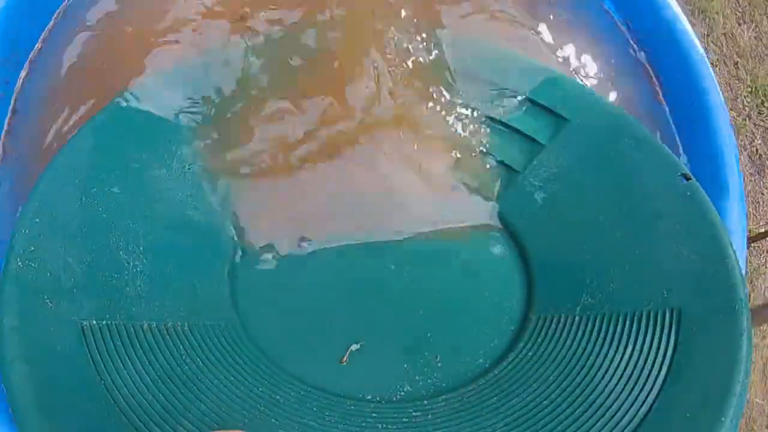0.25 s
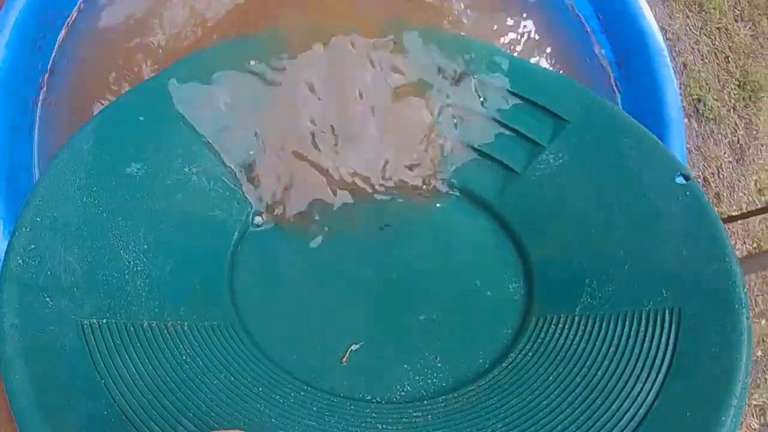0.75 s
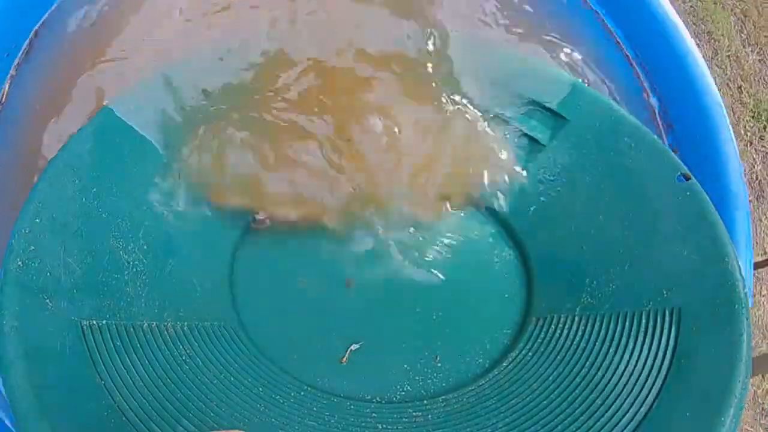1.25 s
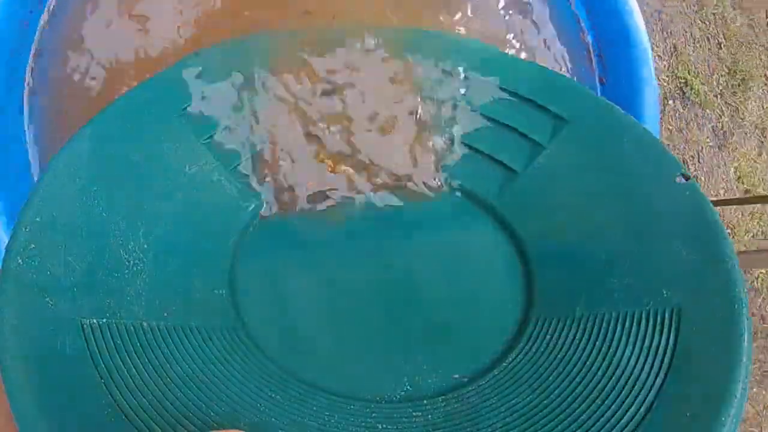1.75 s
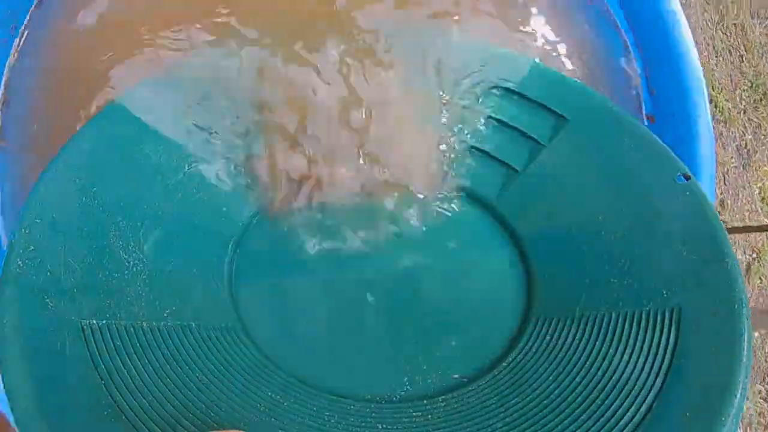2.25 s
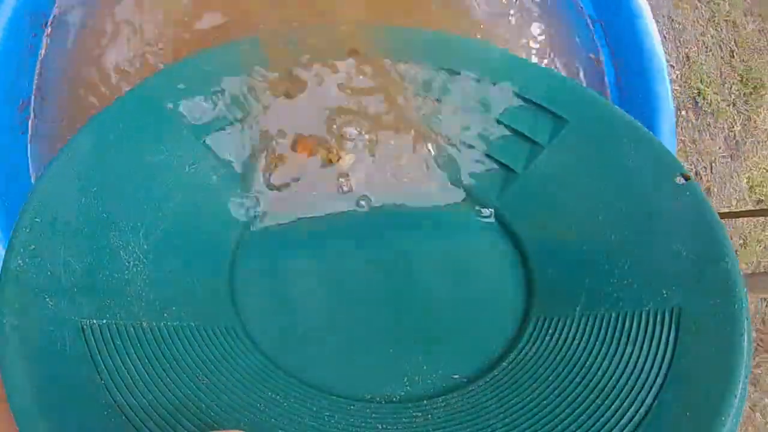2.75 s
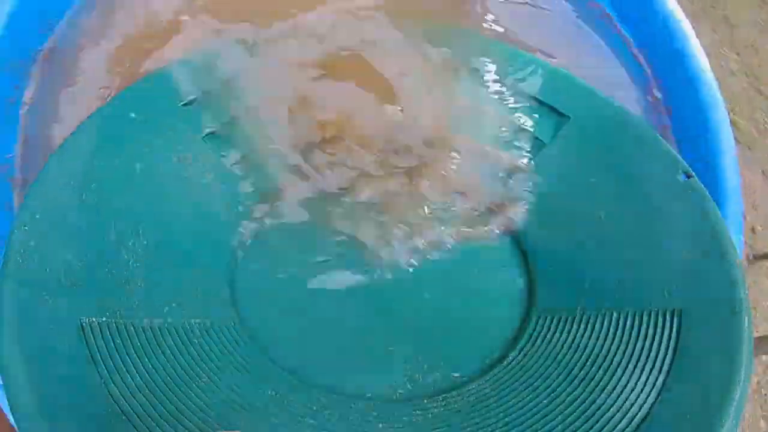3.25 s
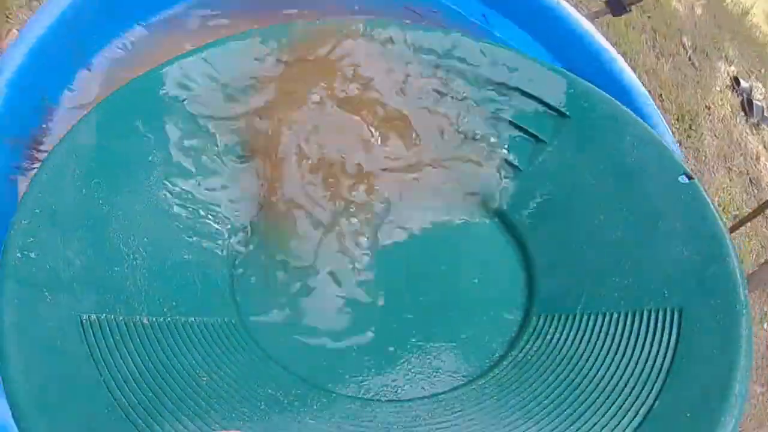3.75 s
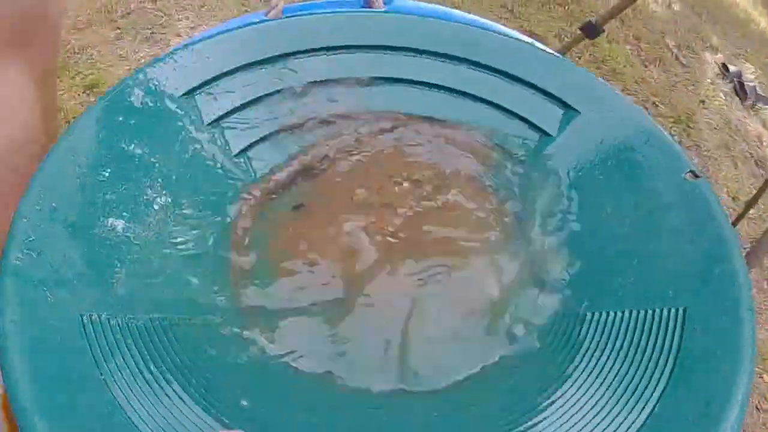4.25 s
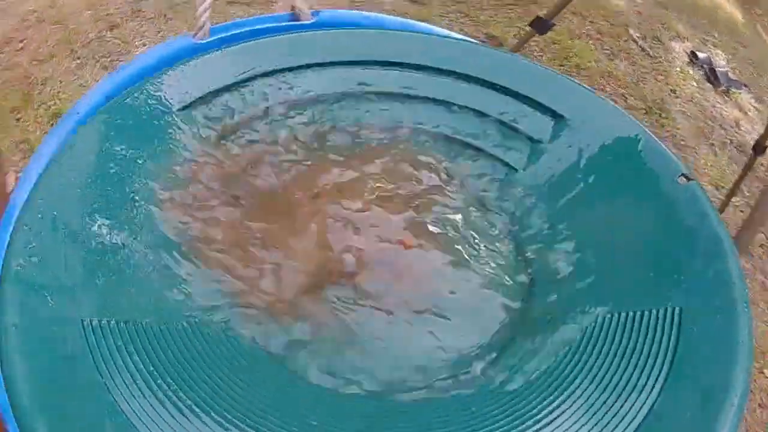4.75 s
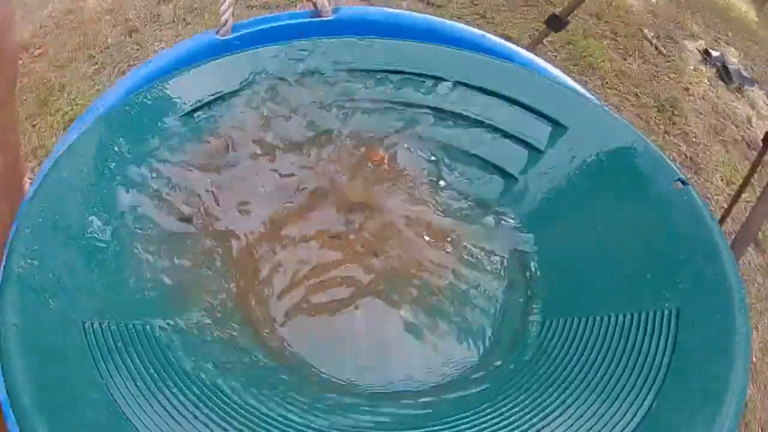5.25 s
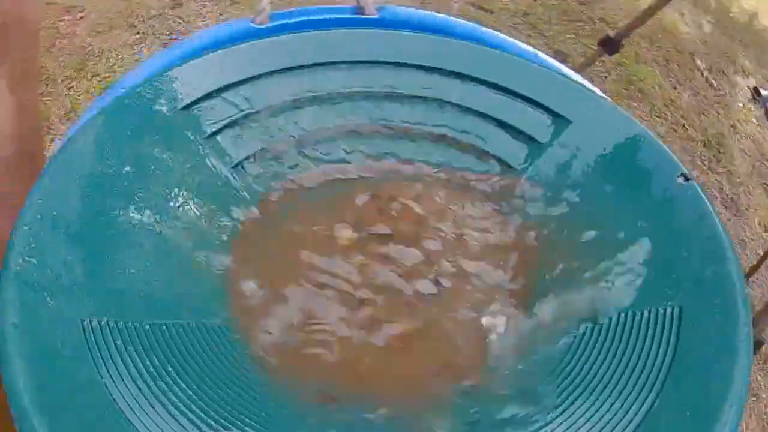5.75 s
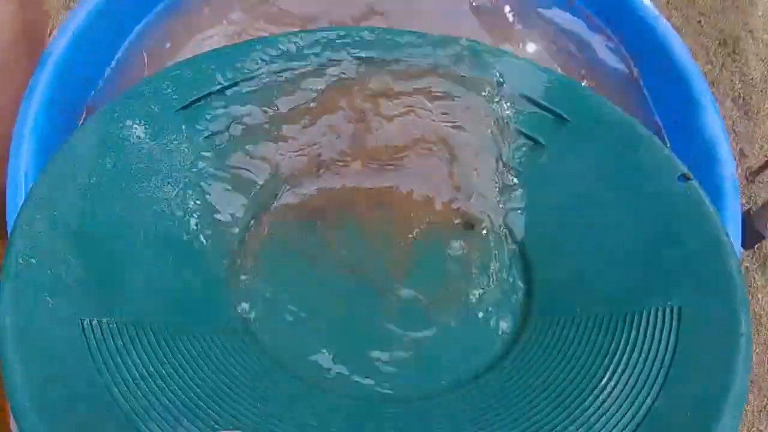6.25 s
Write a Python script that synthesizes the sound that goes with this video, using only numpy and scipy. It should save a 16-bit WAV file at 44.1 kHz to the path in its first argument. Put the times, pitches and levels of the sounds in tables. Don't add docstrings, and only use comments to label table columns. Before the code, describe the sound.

Water slaps and trapped bubbles pop against a resonant plastic shell, with short quiet gaps between dips. A thumping splash follows, then a brief lull, and the swirling load bursts in: gritty sand rush, pebbles clicking, stones knocking hard, slightly overloaded. It stops abruptly with a gulp. Dry, open-air, microphone attached to the rim, low handling rumble and faint hiss.

```python
import sys
import numpy as np
from scipy import signal
from scipy.fft import rfft, irfft
from scipy.io import wavfile
from scipy.ndimage import uniform_filter1d

SR = 44100
rng = np.random.default_rng(int(sys.argv[2]) if len(sys.argv) > 2 else 0)


def to_wav(s):
    ch = np.atleast_2d(s).T
    pcm = np.round(np.clip(ch, -1, 1) * 32767)
    wavfile.write(sys.argv[1], SR, pcm.astype(np.int16))


def voltage_ratio(decibels):
    exponent = np.asarray(decibels, float) / 20
    return 10 ** exponent


N = 286076

# time in seconds, wash level in dB.
WASH = [(0.0, -58.5), (.19, -62.5), (.3, -51.5), (.55, -42), (.8, -51), (.97, -64.5), (1.13, -47),
        (1.42, -47.5), (1.55, -48), (1.8, -54), (1.96, -55.5), (2.13, -37.5), (2.699, -40.5),
        (2.879, -60.5), (3.05, -35), (3.22, -24), (4.6, -23.5), (6.22, -23), (6.399, -51)]
SWIRL_DB = -24
STILL_DB = -70

# frequency in Hz, gain in dB.
SHELL = [(150, -40), (300, -26), (450, -12), (1300, -7), (1650, -5), (1800, -18), (2600, -25), (3300, -24),
         (3950, -34), (4150, -42), (5300, -47), (6300, -58), (8000, -73), (12000, -100)]
# frequency in Hz, width in Hz, gain in dB.
PAN_MODES = [(428, 58, 11.5), (610, 22, -15.5), (784.7, 29.7, -13.5), (810.6, 61, 10), (953, 60, -9),
             (1040, 79, 4), (1176, 112, -8), (1410, 74, 4), (1610, 53, 2.5), (1710, 340, -4.5),
             (2135, 180, 2.5)]
# frequency in Hz, width in Hz, gain in dB.
RIM_MODES = [(2980, 150, -11), (3250, 300, 4), (3720, 200, -5), (3930, 90, 4), (4620, 300, -6),
             (5150, 250, 5), (5750, 400, -6), (6330, 250, 6), (6800, 300, -5), (7500, 900, 5),
             (8700, 900, -12), (10000, 500, 9)]
# frequency in Hz, width in Hz, gain in dB.
SAND_LIFT = (2150, 900, 2.5)
# frequency in Hz, width in Hz, gain in dB.
LOADED_LIFT = (1540, 560, 2.4)
LOADED_SAG, LOADED_DB = 0.98, 0
EDGE_HZ = 2000

# start in seconds, peak in dB, bubble pitch in Hz, sharp edge in dB, bubble share in dB.
OPENING = [
    (-0.003, -9, 1032, -29.5, 1.8),
    (-0.002, -20.5, 445, -50, 14),
]
# peak time in seconds, then as the opening knock.
FIRST_DIP = [(0.112, -34.5, 2410, -47, 10), (0.231, -34, 400, -57, -5), (0.255, -29, 1410, -67, -23),
             (0.274, -14, 986, -44, 8), (0.313, -23.5, 1430, -62, -6), (0.364, -30.5, 980, -67, -1),
             (0.398, -29.5, 670, -59, -1), (0.448, -21, 1350, -51, -0.5), (0.469, -21.5, 1300, -34.5, 13),
             (0.521, -8, 1500, -24, 1.5), (0.587, -28, 695, -37, -5), (0.634, -25, 583, -43, 11),
             (0.673, -18.5, 1534, -25.5, 12), (0.712, -25.5, 1050, -45.5, 2), (0.752, -27, 826, -39, -11),
             (0.771, -18.5, 1400, -39, -7), (0.841, -37, 814, -46, 4), (0.858, -30.5, 480, -48, 8),
             (0.92, -27, 2150, -75, 10)]
SECOND_DIP = [(1.098, -28, 445, -45, 1), (1.153, -25, 1630, -46, -2), (1.204, -25, 790, -38, 2),
              (1.258, -19, 830, -33.5, -5), (1.291, -22.5, 1040, -46, 14), (1.358, -32, 760, -42, -4),
              (1.387, -22.5, 1430, -35, -17), (1.409, -23, 420, -39, -13), (1.438, -17.5, 1350, -44, 10),
              (1.521, -27.5, 813, -67.5, 17), (1.566, -36, 1390, -65, -5), (1.615, -14.5, 1410, -28.5, -10),
              (1.673, -55, 1450, -53, -4), (1.698, -14.5, 1390, -35, -8), (1.733, -19, 1440, -52, -6),
              (1.778, -16, 470, -52, -12), (1.803, -22.5, 428, -38.5, -22), (1.831, -26.5, 820, -48, -9),
              (1.884, -44.5, 423, -53, 5)]
THIRD_DIP = [(2.14, -19.5, 1610, -56, 5), (2.167, -21, 1010, -38, -2.5), (2.203, -16, 1040, -37, -1.5),
             (2.256, -16, 1420, -33, -14), (2.276, -21.5, 420, -57, 21), (2.301, -8.5, 1430, -33.5, 9),
             (2.326, -17, 1290, -51, 2), (2.383, -15, 1040, -49, -3.5), (2.416, -32, 830, -54, 7),
             (2.542, -17, 1504, -36.5, 0.5), (2.574, -9, 1503, -29.5, 3.5), (2.616, -21, 1410, -37, 0),
             (2.638, -6, 1634, -16, 2), (2.683, -27.5, 1400, -57, 19), (2.721, -22.5, 1410, -28.5, -5),
             (2.771, -55, 1420, -44.5, 14), (2.802, -35.5, 1470, -45, 9), (2.847, -39, 818, -47.5, -12),
             (2.897, -36.5, 430, -42, -2)]
SMALL_KNOCKS = [(0.327, -31, 436, -49, -7), (0.516, -31, 1570, -41, 10), (0.667, -16, 1370, -41, -12),
                (1.113, -31, 430, -61, 19), (1.273, -20.5, 1020, -31, 0), (1.629, -24, 1540, -37, 10),
                (1.707, -23, 1400, -38, -6), (1.753, -29, 426, -59, -1), (1.996, -37, 1010, -48, -9),
                (2.135, -29, 1540, -57, -6)]
# start in seconds, then as the dips.
PLUNGE = [(2.015, -24, 1010, -53, 9), (2.046, -8.5, 1650, -25, -16), (2.054, -11, 440, -16.5, 3),
          (2.064, -10, 1020, -20, -8), (2.08, -5.5, 769, -16.5, 0.5), (2.093, -18, 452, -13.5, -4),
          (2.102, -14, 875, -29, 3), (2.114, -16, 452, -47, -3)]
# start in seconds, then as the dips.
LIFT = [
    (2.941, -14, 333, -66, 7),
    (2.946, -14, 723, -56, 21),
    (3.008, -19.5, 1410, -44, -7),
    (3.058, -7.5, 1311, -17.5, 2.5),
    (3.069, -9, 1334, -14, -8),
    (3.087, -15, 1640, -25, -4),
]
# start in seconds, then as the dips.
SETTLE = [
    (6.296, -6.5, 355, -22, -2.5),
    (6.305, -8.5, 712, -23, 18),
    (6.328, -14.5, 1484, -27.5, 1),
    (6.384, -29.5, 2000, -31, 8),
    (6.445, -39, 2650, -62, 4),
]
SPLASH_S, GULP_S, STONE_S = 0.0029, 0.0048, 0.0024
LEAD_S, CREST_DB = 0.001035, 7.5
WET_HZ, STONE_HZ = 4180, 7650

# peak time in seconds, peak in dB, ring
# pitch in Hz, sharp edge in dB.
STONES = [(3.164, -23, 1340, -33), (3.232, -16, 834, -47), (3.256, -9, 1340, -46),
          (3.27, -6, 1270, -22), (3.294, -6, 1404, -23.5), (3.389, -20, 1410, -38),
          (3.41, -15, 437, -39), (3.45, -3.5, 1390, -20.5), (3.483, -2, 1470, -25.5),
          (3.504, -17, 1440, -44.5), (3.533, -5, 1550, -27), (3.648, -11, 1400, -45),
          (3.899, -12, 1335, -37), (3.931, -12, 1410, -33.5), (4.01, -6.5, 1710, -42),
          (4.069, -10, 1500, -24), (4.185, -8, 1537, -26.5), (4.212, -23, 1540, -42),
          (4.248, -5, 1400, -23.5), (4.308, -10.5, 843, -23), (4.391, -13, 1520, -42),
          (4.424, -9.5, 810, -28), (4.451, -17, 1690, -28), (4.483, -1, 1440, -17),
          (4.494, -8, 413, -20.5), (4.554, -9.5, 820, -35), (4.601, -8, 1360, -30),
          (4.682, -33, 827, -44), (4.704, -26, 1610, -45),
          (4.721, -11, 1610, -41), (4.752, -7.5, 790, -27.5), (4.798, -10.5, 1430, -22.5),
               (4.822, -1, 814, -10.5), (4.8815, -5.5, 1514, -24), (4.945, -14.5, 800, -31.5),
               (5.072, -0.5, 1330, -17.5), (5.116, -4, 1040, -17), (5.142, -5.5, 840, -20.5),
               (5.202, -9, 1313, -28), (5.255, -16, 1610, -29), (5.3, -8.5, 715, -46),
               (5.371, -12.5, 1570, -17.5), (5.425, -18, 1500, -28), (5.449, -1, 886, -18.5),
               (5.491, -10, 1410, -43), (5.568, -6.5, 1620, -40.5), (5.592, -5, 1620, -43.5),
               (5.626, -4.5, 1455, -19), (5.705, -12, 1363, -26.5), (5.751, -15, 1380, -32),
               (5.812, -9, 777, -31), (5.909, -11, 1460, -28), (5.986, -7.5, 1540, -45),
               (6.031, -9.5, 832, -26), (6.12, -7.5, 804, -30), (6.174, -9, 1420, -24.5),
               (6.245, -0.5, 1410, -18.5)]
STONE_RING_DB = -1.5
# peak time in seconds, peak in dB, pitch in Hz.
PEBBLES = [(3.304, -15, 1460), (3.3222, -11.5, 1410), (3.466, -10.5, 1420), (3.5693, -18, 1630),
           (3.6596, -18, 1440), (3.6703, -12.5, 1610), (3.8121, -17.5, 1400), (3.9473, -16, 1510),
           (4.101, -11.5, 1360), (4.134, -12, 1410), (4.1452, -12, 1390), (4.1677, -19, 1240),
           (4.1683, -12, 1390), (4.1974, -12.5, 1550), (4.3267, -14, 1320), (4.6142, -12.5, 1470),
           (4.8264, -5, 1546), (4.8507, -12.5, 1380), (4.8977, -10.5, 1470), (4.888, -8, 1500),
           (5.107, -9, 1490), (5.3909, -10, 1550), (5.6063, -12, 1494), (5.7587, -8.5, 1440),
           (5.797, -10, 1470), (5.097, -15.5, 1390), (5.8505, -12, 1520), (5.866, -14.5, 1550),
           (5.917, -14.5, 1480), (5.925, -9, 1590), (5.9963, -8.5, 1580), (6.0477, -14, 1560),
           (6.0617, -6.5, 1145), (6.0831, -11, 1420), (6.131, -9, 1150), (6.131, -15, 1410),
           (6.1858, -11, 1410), (6.2147, -13.5, 1410), (6.2368, -14.5, 1440), (6.2578, -18.5, 1440)]
# peak time in seconds, peak in dB, pitch in Hz.
COBBLES = [(3.202, -15, 1040), (4.223, -12, 670), (4.488, -10, 840), (4.62, -12.5, 827), (4.733, -13, 815),
           (4.98, -14, 1040), (5.36, -18, 780), (5.473, -10.5, 830), (5.552, -20, 840), (6.095, -12.5, 850)]
PEBBLE_EDGE_DB, PEBBLE_RING_DB = -10.5, 4.5

# time in seconds, lift over the wash in dB.
SURGES = [(3.28, 5.5), (3.47, 5), (3.59, 5.5), (4.59, 3.5), (4.02, 3), (4.22, 3.5), (4.47, 7.5), (4.83, 8),
          (4.95, 2), (5.11, 7), (5.385, 6.5), (5.46, 1.5), (5.68, 3), (5.82, 2), (6.03, -0.5), (6.18, 2.5)]
# time in seconds, lift over the wash in dB.
LULLS = [(3.246, -6), (3.44, -5.5), (3.958, -9.5), (4.665, -7.5), (4.77, 2), (4.868, -5.5), (4.912, -5),
         (5.02, 0), (5.325, -6.5)]
SURGE_S, LULL_S = 0.044, 0.012
SURGE_BRIGHT = 1
GRIT_DB, GRIT_SLOPE = -35, 0.99
SLOW_CLUMP_DB = 1.5

# start in seconds, peak in dB, pitch in Hz.
BUMPS = [(1.137, -27, 490), (1.167, -34, 514), (2.06, -14, 252), (3.05, -30, 302), (3.445, -36, 289),
         (3.685, -25, 252.4), (4.007, -37, 111), (5.679, -37, 114.4), (6.289, -21.5, 230)]
# start in seconds, peak in dB, pitch in Hz.
THUDS = [
    (2.053, -29, 126),
    (2.084, -24.5, 180),
    (2.943, -38, 125),
    (6.303, -37, 137),
]
# start in seconds, peak in dB, pitch in Hz, fade in seconds.
TUB_RING = (2, -38.5, 163, 0.08)
# time in seconds, lift over the resting rumble in dB.
JOLTS = [(0.0, 27.5), (1.14, 10.5), (1.27, 5), (.86, 10.5), (2.08, 29), (2.33, 11), (2.2, 15), (3.03, 17),
         (3.68, 13.5), (4.01, 6), (4.22, 5), (4.5, 3.5), (4.9, 7), (6.16, 8), (6.31, 19)]
# frequency in Hz, level in dB per Hz.
RUMBLE = [(20, -3.5), (45, -8.5), (88, 3.5), (130, -6), (160, -0.5), (200, -12), (300, -3.5), (500, -40),
          (1200, -130)]
REST_DB, GRIP_SLOPE, JOLT_S = -57.5, 0.3, 0.053

# start in seconds, peak in dB, pitch in Hz.
SPRAY = [(.328, -58, 4900), (0.569, -46, 4100), (1.197, -52, 5100), (1.261, -54, 6300), (2.201, -54, 5960),
         (2.239, -37.5, 4880), (2.257, -59.5, 5500), (2.288, -55, 4460), (2.333, -63, 5140)]
SPRAY_S = 0.0019
# peak time in seconds, peak in dB, pitch in Hz.
SLAPS = [(3.0705, -11, 2170), (3.3033, -10.5, 2140), (3.4657, -13, 2060), (3.7367, -20, 2200),
         (4.0524, -20, 2080), (4.0866, -22, 2030), (4.1172, -18, 2040), (4.1318, -20, 2080),
         (4.2848, -20, 2130), (4.3214, -30, 2340), (4.4509, -10, 2100), (4.7533, -20, 2100),
         (4.981, -18, 1780), (5.865, -23, 2240), (5.9714, -19.5, 2060), (5.995, -22, 2070),
         (6.0462, -14.5, 1910)]
# peak time in seconds, peak in dB, pitch in Hz.
BIG_BUBBLES = [(1.141, -30, 467), (1.162, -34, 428), (1.717, -40, 428), (1.737, -33.5, 400),
               (2.233, -26.5, 436), (2.366, -48, 400), (2.444, -37.5, 438), (2.469, -36.5, 456),
               (2.564, -31, 455), (2.583, -26, 408), (3.573, -21, 403), (6.097, -19.5, 457),
               (6.132, -19.5, 430)]
MID_BUBBLES = [(0.532, -23.5, 821), (0.673, -27, 1040), (0.789, -30.5, 826), (1.444, -30.5, 800),
               (2.216, -21, 990), (2.246, -27, 798), (2.325, -26, 1000), (2.565, -28.5, 835),
               (2.647, -24, 680)]
SMALL_BUBBLES = [(0.605, -29.5, 1410), (0.8066, -30.5, 1520), (1.175, -31, 1380), (1.3009, -34, 1330),
                 (2.1493, -28, 1410), (2.2419, -29, 1600), (2.2944, -26, 1360), (2.5667, -25, 1440),
                 (2.602, -25, 1470), (2.6626, -32, 1445), (6.4598, -44, 1410), (6.4774, -40, 1410)]
FINE_BUBBLES = [(0.5876, -38, 2220), (0.788, -32, 2080), (1.101, -31, 2470), (1.153, -33, 1850),
                (2.1153, -30, 2360), (2.212, -28, 1980), (2.239, -29, 2480), (2.3127, -26, 2060),
                (2.5394, -28.5, 2220), (3.0987, -31, 2060)]
TINY_BUBBLES = [(0.6467, -44, 3300), (1.1844, -40, 3200), (1.2403, -37, 3300), (1.261, -29, 3240),
                (1.3217, -39, 3280), (2.2373, -25.5, 3530), (2.2857, -45, 3520), (2.4443, -38.5, 3200),
                (2.458, -42, 3190), (2.6996, -47, 3270)]
# peak time in seconds, peak in dB,
# pitch in Hz.
SPITS = [(2.032, -32.5, 1620), (2.053, -23, 3140), (2.062, -24, 3340), (2.098, -24, 3150),
         (2.106, -31, 3270), (2.087, -10, 426), (2.088, -15, 1510), (3.19, -24.5, 406), (3.27, -23, 404),
         (5.121, -15.5, 430), (5.2, -25, 415), (5.46, -18, 407), (3.47, -11, 790)]
BUBBLE_CYCLES, SLAP_CYCLES = 4.7, 3.4
BUBBLE_GLIDE = 0.004

# start in seconds, peak in dB.
OVERLOADS = [(2.0825, -72), (3.4499, -69.5), (3.4835, -63.5), (4.4845, -63), (4.8226, -59.5),
             (4.828, -62.5), (5.0714, -66), (5.1196, -77.5), (5.4505, -60), (5.376, -72.5), (5.627, -64.5),
             (6.2447, -69)]
ROUND_HZ = 5000
# frequency in Hz, level in dB per Hz.
HISS = [(2500, -30), (4500, 10.5), (7000, -4.5), (10000, -15), (12500, -5), (16000, -5)]
HISS_DB = -76.5


def rms1(x):
    return x / np.sqrt(np.mean(x ** 2))


def peak1(x):
    return x / abs(x).max()


def add(out, s, sound):
    i = int(s * SR)
    part = sound[max(-i, 0):N - i]
    start = max(i, 0)
    out[start:start + len(part)] += part


def low_pass(x, order, hz):
    return signal.sosfilt(signal.butter(order, hz, fs=SR, output="sos"), x)


def shape_db(hz, points):
    f, db = np.transpose(points)
    return np.interp(np.log(hz + 1), np.log(f), db)


def causal(db, size=4096):
    cep = irfft(np.log(voltage_ratio(db)))
    cep[1:size] *= 2
    cep[size + 1:] = 0
    return irfft(np.exp(rfft(cep)))[:size]


def colour(points):
    gain = voltage_ratio(shape_db(np.fft.rfftfreq(N, 1 / SR), points))
    return rms1(irfft(rfft(rng.standard_normal(N)) * gain, N))


def walk(rate):
    k = int(SR / rate)
    held = np.repeat(rng.standard_normal(N // k + 1), k)
    return rms1(uniform_filter1d(uniform_filter1d(held, k), k)[:N])


def swells(table, width):
    t = np.arange(N) / SR
    return sum(db * np.exp(-((t - s) / width) ** 2) for s, db in table)


def pan_shell(sag=1, damp_db=0, lift=()):
    hz = np.fft.rfftfreq(8192, 1 / SR)
    (deep, width, gain_db), *upper = PAN_MODES + RIM_MODES
    modes = [(deep * sag, width, gain_db + damp_db), *lift] + upper
    db = shape_db(hz, SHELL) + sum(g / (1 + (2 * (hz - f) / w) ** 2) for f, w, g in modes)
    body_cut_db = 10 * np.log10(1 + (hz / EDGE_HZ) ** 12)
    edge_cut_db = 10 * np.log10(1 + (EDGE_HZ / (hz + 1)) ** 12)
    return causal(db - body_cut_db), -causal(db - edge_cut_db)


def rows(table, length, lead=0.0, crest_db=0.0, bubble_db=0.0):
    return [(s - lead, db, hz, edge_db + crest_db, length, *(share or [bubble_db]))
            for s, db, hz, edge_db, *share in table]


def knocks(table, body, edge, rise):
    out, t = np.zeros(N), np.arange(3072) / SR
    chance = rng.standard_normal((len(table), len(t)))
    for (s, db, hz, edge_db, length, bubble_db), noise in zip(table, chance):
        splash = noise * np.exp(-t / max(length, 0.0005)) * (1 - np.exp(-t / rise)) ** 2
        tone = np.sin(2 * np.pi * hz * t * (1 + 1.6 * t))
        bubble = tone * np.exp(-t / (1.2 * length)) * (1 - np.exp(-t / 0.00027)) ** 2
        low = peak1(signal.fftconvolve(splash, body))
        low = low + voltage_ratio(bubble_db) * peak1(signal.fftconvolve(bubble, body))
        high = peak1(signal.fftconvolve(splash, edge))
        add(out, s, voltage_ratio(db) * peak1(low) + voltage_ratio(edge_db - 1.5) * high)
    return out


def handling(rumble_db):
    flicker_db = 2.5 * walk(12)
    out, t = voltage_ratio(rumble_db + flicker_db) * colour(RUMBLE), np.arange(8192) / SR
    for s, db, hz in BUMPS + THUDS:
        swell = np.exp(-t * hz / 3.5) * (1 - np.exp(-t / 0.0019))
        add(out, s, voltage_ratio(db - 1.5) * np.sin(2 * np.pi * hz * t) * swell)
    s, db, hz, fade = TUB_RING
    t = np.arange(SR // 2) / SR
    add(out, s, voltage_ratio(db) * np.sin(2 * np.pi * hz * t) * np.exp(-t / fade) * (1 - np.exp(-t / 0.006)))
    return out


def droplets(count=1600):
    out, t = np.zeros(N), np.arange(1024) / SR
    for when, size, loud in rng.random((count, 3)):
        hz = 600 * 7.82 ** size
        swell = (1 - np.exp(-t / 0.00017)) * np.exp(-t * hz / 4.5)
        tone = np.sin(2 * np.pi * hz * t * (1 + 12.0 * t))
        add(out, when * N / SR, voltage_ratio(12 * loud) * swell * tone)
    return rms1(out)


def rattle(clumps):
    hit = rng.random(N) < 1500 / SR
    loud_db = 2.33 * np.minimum(rng.exponential(size=N), 4.0)
    grains = hit * rng.standard_normal(N) * voltage_ratio(loud_db)
    sand = voltage_ratio(-3.5) * rng.standard_normal(N)
    return rms1(clumps * (rms1(grains) + sand))


def gravel(wash_db, grit_db, body, loaded, edge):
    gentle = np.clip((SWIRL_DB - wash_db) / 12, 0, 1)
    slow_db = SLOW_CLUMP_DB * walk(35)
    quick_db = 2.14 + 3.7 * gentle
    drops = voltage_ratio(-19.0 + 5.9 * gentle) * droplets()
    coarse = rattle(voltage_ratio(slow_db + quick_db * walk(110))) + drops
    fine = rattle(voltage_ratio(slow_db + quick_db * walk(150))) + drops
    still = voltage_ratio(STILL_DB) * rng.standard_normal(N)
    body, loaded, edge = [path / np.linalg.norm(path) for path in (body, loaded, edge)]
    low = signal.fftconvolve(gentle * coarse * voltage_ratio(wash_db) + still, body)
    low = low + signal.fftconvolve((1 - gentle) * coarse * voltage_ratio(wash_db), loaded)
    high = signal.fftconvolve(fine * voltage_ratio(grit_db) + voltage_ratio(-2.0) * still, edge)
    return (low + high)[:N]


def spray():
    out, t = np.zeros(N), np.arange(1024) / SR
    for s, db, hz in SPRAY:
        blip = np.sin(2 * np.pi * hz * t * (1 + 7.3 * t)) * t * np.exp(-t / SPRAY_S * 2)
        add(out, s, voltage_ratio(db) * peak1(blip))
    return out


def bubbles(table, cycles):
    out, t = np.zeros(N), np.arange(4096) / SR
    for s, db, hz in table:
        turns = hz * t
        tone = np.sin(2 * np.pi * turns * (1 + BUBBLE_GLIDE * turns))
        swell = np.exp(-turns / cycles) * (1 - np.exp(-turns / 0.71)) ** 3
        add(out, s - LEAD_S, voltage_ratio(db) * peak1(tone * swell))
    return out


def round_peaks(dry):
    rounded = dry / (1 + (abs(dry) / 0.9) ** 6) ** (1 / 6)
    smooth = signal.butter(4, ROUND_HZ, fs=SR, output="sos")
    return dry + signal.sosfiltfilt(smooth, rounded - dry)


def overload_ticks():
    ticks, t = np.zeros(N), np.arange(256) / SR
    for (s, db), noise in zip(OVERLOADS, rng.standard_normal((len(OVERLOADS), len(t)))):
        add(ticks, s, voltage_ratio(db + 9.5) * peak1(noise * t * np.exp(-t / 0.0007)))
    ticks = signal.sosfilt(signal.butter(2, 5500, "high", fs=SR, output="sos"), ticks)
    return ticks + voltage_ratio(14.5) * low_pass(ticks, 4, 8800)


def scene():
    wash_db = np.interp(np.arange(N) / SR, *np.transpose(WASH))
    surge_db = swells(SURGES, SURGE_S) + swells(LULLS, LULL_S)
    grit_db = GRIT_DB + GRIT_SLOPE * (wash_db - SWIRL_DB) + SURGE_BRIGHT * surge_db
    grit_db = grit_db + swells([(1.1, 3.6), (4.3, 1.7), (5.6, 1.3)], 0.67)
    rumble_db = REST_DB + GRIP_SLOPE * (wash_db - SWIRL_DB) + swells(JOLTS, JOLT_S)

    body, edge = pan_shell()
    loaded = pan_shell(LOADED_SAG, LOADED_DB, [LOADED_LIFT])[0]
    sandy_edge = pan_shell(lift=[SAND_LIFT])[1]
    stone_edge = low_pass(edge, 3, STONE_HZ)
    wet_edge = low_pass(edge, 2, WET_HZ)

    dips = rows(FIRST_DIP + SECOND_DIP + THIRD_DIP + SMALL_KNOCKS, SPLASH_S, LEAD_S, CREST_DB)
    dips = dips + rows(OPENING, SPLASH_S)
    water = knocks(dips + rows(LIFT + SETTLE, GULP_S), body, wet_edge, rise=0.0006)
    water = water + knocks(rows(PLUNGE, GULP_S), body, edge, rise=0.0019)
    lone = BIG_BUBBLES + MID_BUBBLES + SMALL_BUBBLES + FINE_BUBBLES + TINY_BUBBLES + SPITS
    water = water + bubbles(lone, BUBBLE_CYCLES) + bubbles(SLAPS, SLAP_CYCLES) + spray()

    tumbling = rows(STONES, STONE_S, LEAD_S, CREST_DB, STONE_RING_DB)
    stones = knocks(tumbling, loaded, stone_edge, rise=0.00061)
    small = [(s, db, hz, db + PEBBLE_EDGE_DB) for s, db, hz in PEBBLES + COBBLES]
    small = rows(small, 0.002, LEAD_S, bubble_db=PEBBLE_RING_DB)
    stones = stones + knocks(small, loaded, stone_edge, rise=0.00067)

    load = gravel(wash_db + surge_db, grit_db, body, loaded, sandy_edge)
    return (water + stones + load + handling(rumble_db))[None]


def band_limit(x):
    return signal.sosfilt(signal.butter(12, 15830, fs=SR, output="sos"), x)


def record(dry):
    hiss = voltage_ratio(HISS_DB) * colour(HISS)
    mix = round_peaks(dry) + overload_ticks() + hiss
    return band_limit(mix)


dry = scene()
out = record(dry)
to_wav(out)
```